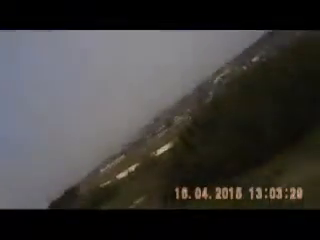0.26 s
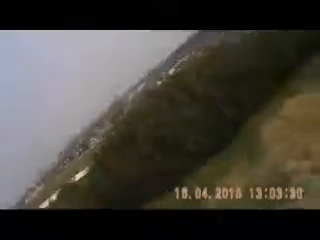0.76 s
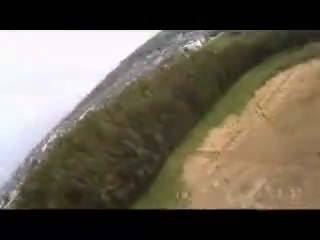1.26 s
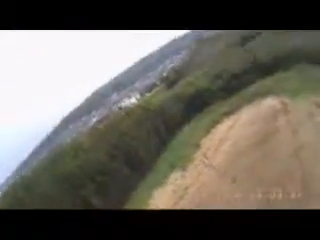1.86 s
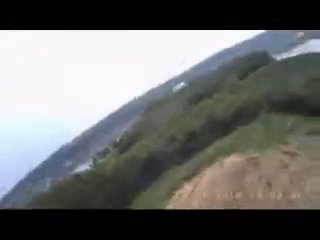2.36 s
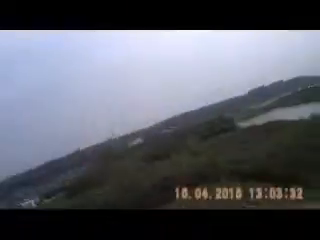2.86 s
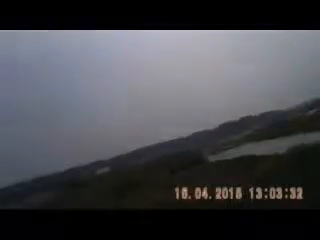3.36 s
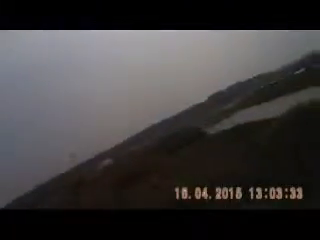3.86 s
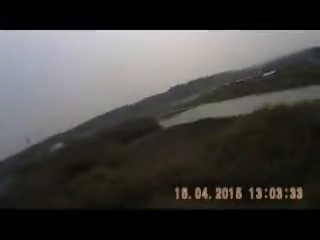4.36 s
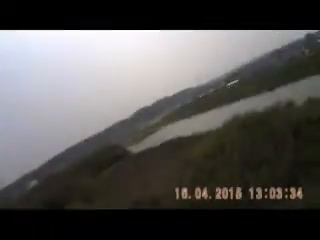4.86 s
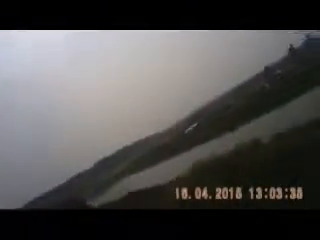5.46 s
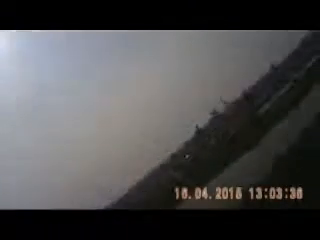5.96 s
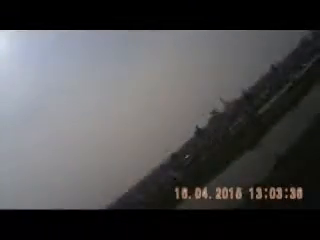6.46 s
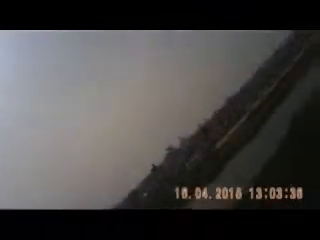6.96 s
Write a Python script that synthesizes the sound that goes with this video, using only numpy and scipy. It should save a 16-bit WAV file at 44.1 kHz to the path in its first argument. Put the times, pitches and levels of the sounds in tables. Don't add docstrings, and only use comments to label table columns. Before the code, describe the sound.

Low wind buffets a small gliding model aircraft with ticking servos, then its electric motor whirs up abruptly into a harsh, rattling buzz.

```python
import sys
import numpy as np
from scipy import signal
from scipy.io import wavfile
from scipy.ndimage import uniform_filter1d, map_coordinates

SR = 44100
rng = np.random.default_rng(int(sys.argv[2]) if len(sys.argv) > 2 else 0)


def magnitude_from_level(level_db):
    exponent = np.asarray(level_db, float) / 20
    return 10 ** exponent


def put_to_file(sound):
    columns = np.atleast_2d(sound).T
    safe = np.clip(columns, -1, 1)
    whole_steps = np.round(safe * 32767)
    wavfile.write(sys.argv[1], SR, whole_steps.astype(np.int16))


N = 318843

# (time [s], speed gained [turns/s], spin-up [turns/s^2], sharpness of the knee [1])
THROTTLE = [
    (4.0157, 87.183, 371.3, 5.85),
    (6.3207, 5.974, 56.56, 2.59),
]
RUN = slice(round(THROTTLE[0][0] * SR), N)
CRUISE_SPEED_HZ = 86


def rms_one(x):
    return x / np.sqrt(np.mean(x ** 2) + 1e-20)


def in_time(rows):
    s, *columns = np.transpose(rows)
    return [np.interp(np.arange(N) / SR, s, c) for c in columns]


def drift(rate):
    r = np.exp(-80 * np.pi * rate / SR)
    slow = signal.lfilter([1], [1, -2 * r, r * r], rng.standard_normal(N // 40 + 2002))[2000:]
    return np.interp(np.arange(N) / 40, np.arange(len(slow)), rms_one(slow))


def band_pass(x, order, band_hz):
    return signal.sosfilt(signal.butter(order, band_hz, "band", fs=SR, output="sos"), x)


def ring(clicks, modes):
    out = 0
    for hz, db, t60 in modes:
        r, w = magnitude_from_level(-60 / (t60 * SR)), 2 * np.pi * hz / SR
        b, a = [0, magnitude_from_level(db) * np.sin(w)], [1, -2 * r * np.cos(w), r * r]
        out = out + signal.lfilter(b, a, clicks + 1e-18)
    return out


def turbulence(spectrum, lumps_db, own_db):
    hz, db = np.transpose(spectrum)
    out, white = 0, rng.standard_normal((2, N))
    edges = hz[0] * 2 ** np.arange(0, np.log2(hz[-1] / hz[0]) + .2, 1 / 3)
    for k, (low, high) in enumerate(zip(edges, edges[1:])):
        band = band_pass(white[k % 2], 2, [low, high])
        level_db = np.interp(np.log(low * high) / 2, np.log(hz), db)
        out = out + band * magnitude_from_level(level_db + own_db * drift(16.3))
    return rms_one(out * magnitude_from_level(lumps_db))


def wind():
    # (frequency [Hz], density [dB per Hz])
    buffet_spectrum = [(18, -39), (30, -10), (75, -6.5), (123, -5.5), (187, -2.5), (293, -2), (444, -7.5),
                       (508, -12.5), (590, -9), (744, -18), (850, -20), (939, -39), (1600, -35),
                       (2080, -47.5), (3520, -120)]
    hiss_spectrum = [(530, 0), (900, 1), (1160, -2.5), (1830, -10.5), (2350, -17.5), (2820, -14.5),
                     (4000, -27.5), (5200, -58), (8800, -120)]
    # (time [s], level [dB])
    airspeed = [(0, -34.5), (.7, -37.5), (1.0, -31.5), (1.55, -33.5), (2.3, -35.5), (2.7, -38.5),
                (3.6, -38.5), (3.95, -43), (4.04, -38)]
    # (time [s], peak level [dB])
    gusts = [(.025, -0.5), (.07, 2.5), (.15, -3), (0.216, -10), (0.287, -22), (0.355, -5.5), (0.671, -20),
             (0.937, -5.5), (1.258, -12), (1.333, -5), (1.56, -11), (1.625, -18), (1.961, -9), (2.012, -10),
             (2.137, -19), (2.477, -4), (2.77, -18), (2.905, -5.5), (3.01, -2.5), (3.084, -7.5),
             (3.135, -4.5), (3.191, -6), (3.363, -5), (3.445, -4), (3.57, -6), (3.707, -9), (3.769, -7)]
    rise_s, fall_s, gust_gain_db = 0.0029, 0.014, -7
    t = np.arange(N) / SR
    hiss_db, = in_time(airspeed)
    power = magnitude_from_level(-21 + 0.16 * (hiss_db + 42)) ** 2
    calm = power.copy()
    for s, db in gusts:
        decay = np.maximum((s - t) / rise_s + 1, (t - s) / fall_s).clip(0)
        power += magnitude_from_level(db + gust_gain_db) ** 2 * np.exp(-2 * decay)
    fade = np.clip((4.13 - t) / .08, 0, 1)
    duck = (calm / power) ** (0.76 / 2)
    eddies = drift(32)
    buffet = np.sqrt(power) * turbulence(buffet_spectrum, 0.5 * eddies, own_db=2.5)
    hiss = magnitude_from_level(hiss_db) * duck * turbulence(hiss_spectrum, 0.27 * eddies, own_db=1.4)
    return fade * (buffet + hiss)


def slipstream(speed, opened, eddies):
    # (frequency [Hz], density [dB per Hz])
    wash_spectrum = [(18, -53), (30, -10), (61, -7.5), (87, -9.5), (108, -3.5), (134, -3), (265, -0.5),
                     (467, -9.5), (924, -9), (1060, -27), (1230, -14), (1290, -27), (1600, -32),
                     (2080, -62), (3520, -120)]
    level_db = -17.5 + opened + 1.85 * drift(4.1) + 0.62 * 20 * np.log10(speed / CRUISE_SPEED_HZ)
    return magnitude_from_level(level_db) * turbulence(wash_spectrum, 0.51 * eddies, own_db=2.0)


def jolts():
    # (time [s], peak level [dB])
    blows = [(0.0553, 2), (0.0702, 0.5)]
    # (frequency [Hz], level [dB], decay t60 [s])
    hull = [(309, 0.5, 0.078), (720, -10.5, 0.036)]
    clicks = np.zeros(N)
    for s, db in blows:
        clicks[round(s * SR)] = -magnitude_from_level(db)
    return ring(uniform_filter1d(clicks, size=24), hull)


def commands():
    # (time [s], peak level [dB], bright whirr [dB], dull click [dB])
    corrections = [(0.0502, -13, -25, -10.5), (0.113, -30.5, -3, -4), (0.1978, -30, -15, -9),
                   (0.2427, -26, -22, -21), (0.2627, -30, -17, 1), (0.2866, -33, -3, -7), (0.374, -29.5, -11, 5),
                   (0.3969, -32, -8, 9), (0.5051, -25.5, -21, -3), (0.573, -31, -17, -12),
                   (0.9047, -32, -15, -2.5), (0.9456, -20.5, -15, -2.5), (0.9895, -24, -15, -2.5),
                   (1.0135, -30.5, -11, 7), (1.0339, -32, -14, 4), (1.1437, -31, -15, -2.5),
                   (1.497, -22.5, -14, -7), (1.7812, -28.5, -14, -2.5), (1.8471, -24, -13, 0.5),
                   (1.8695, -24, -17, -1), (1.9798, -31, -12, -6), (2.0242, -37, -9, -2.5),
                   (2.2003, -33.5, -5, -7), (2.2222, -36, -4.5, -6), (2.5071, -29, -16, -8),
                   (2.9256, -28, -22, -7), (2.969, -32.5, -16, -2.5), (3.652, -31, -18, -6),
                   (3.8989, -36, -19, -1), (4.0416, -34, -9, -4)]
    # (time [s], peak level [dB])
    more_corrections = [(0.156, -34), (0.4368, -33), (0.552, -31), (1.1008, -37), (1.6715, -30.5), (1.8291, -26.5),
                        (2.4422, -34), (2.463, -32), (2.529, -32), (2.6403, -36), (2.8598, -36), (3.3217, -32),
                        (3.3656, -36), (3.499, -35), (3.5213, -38), (3.7183, -35), (3.922, -31)]
    frame_s, first_frame_s = .021985, .0026
    whirr_db, dull_db = -16.5, -6
    frames = np.arange(first_frame_s, THROTTLE[0][0], frame_s)
    size_db = -40 - 0.7 * frames + 2.5 * rng.standard_normal(len(frames)).clip(-3, 1.6)
    taken_s = [row[0] for row in corrections + more_corrections]
    free = np.abs(frames[:, None] - taken_s).min(axis=1) > frame_s / 2
    minor = more_corrections + list(zip(frames[free], size_db[free]))
    return corrections + [(s, db, whirr_db, dull_db) for s, db in minor]


def servos():
    out, t, kicks = np.zeros(N), np.arange(900) / SR, commands()
    grit = rng.standard_normal((len(kicks), 3, len(t)))
    dull = band_pass(grit[:, 0], 2, (1300, 2020))
    middle = band_pass(grit[:, 1], 2, (2500, 3010))
    whirr = band_pass(grit[:, 2], 2, (3600, 4850))
    for k, (s, db, bright_db, dull_db) in enumerate(kicks):
        tick = magnitude_from_level(dull_db) * rms_one(dull[k]) * np.exp(-t / 0.0033)
        tick += magnitude_from_level(-7.0) * rms_one(middle[k]) * np.exp(-t / 0.004)
        tick += magnitude_from_level(bright_db + 12.0) * rms_one(whirr[k]) * t / 0.0034 * np.exp(-t / 0.0031)
        out[round(s * SR):round(s * SR) + len(t)] += magnitude_from_level(db) * tick
    return out


def knocks(turns, share, spread_db):
    at = np.flatnonzero(np.diff(np.floor(turns - share)) > 0)
    chance = np.clip(rng.standard_normal((400, 2))[:len(at)], -2.5, 1.3)
    late = (.00008 * SR * chance[:, 0]).astype(int)
    clicks = np.zeros(N)
    clicks[np.clip(at + late, 0, N - 1)] = magnitude_from_level(spread_db * chance[:, 1])
    return clicks


def loose_mount(turns, speed, opened, eddies):
    # (share of a turn [1], level [dB], spread [dB])
    rebounds = [(0, -2.5, 1.5), (0.291, -6, 3), (.45, -6, 3), (.7, -7, 2.5)]
    # (frequency [Hz], level [dB], decay t60 [s])
    mount = [(1640, -5, 0.034), (2250, 8, 0.0055), (2490, -8, 0.057), (2600, 1, 0.045), (2866, 4.5, 0.015),
             (3260, -7, 0.038)]
    # (frequency [Hz], density [dB per Hz])
    grit_spectrum = [(760, 1), (1300, 2), (1730, -15), (2120, -1), (2400, -2), (2600, 0), (2930, -4.5),
                     (3150, -5), (4000, -21), (5200, -51), (8800, -120)]
    since = np.arange(N) / SR - 4.1
    level_db = -28.5 - 0.5 * opened + 0.96 * since + 250 * np.minimum(since, 0)
    level_db += -4 / (1 + np.exp((speed - 64) / 7.5))
    sharp = uniform_filter1d(knocks(turns, 0, spread_db=1.0), size=8)
    spike = band_pass(sharp, 1, [1100, 2600])
    blows = sum(magnitude_from_level(db) * knocks(turns, share, spread) for share, db, spread in rebounds)
    rebound = ring(blows, mount)
    gate = magnitude_from_level(9.1 * np.cos(2 * np.pi * (turns - .12)))
    grit = gate * turbulence(grit_spectrum, 0.35 * eddies, own_db=1.5)
    on = np.sqrt(np.mean(turns > 0))
    loose = np.clip(turns / 45, .3, 1)
    rattle = magnitude_from_level(-8) * loose * on * rms_one(spike)
    rattle += magnitude_from_level(-4.5 + 1.78 * drift(11.7)) * on * rms_one(rebound) + magnitude_from_level(-6.5) * grit
    return magnitude_from_level(level_db) * rattle


def rotor_search():
    # (time [s], level [dB])
    search_hum = [(3.85, -120), (3.885, -62), (3.9, -35), (3.97, -34), (4.04, -29.5), (4.07, -26.5),
                  (4.15, -27), (4.2, -60), (4.22, -90)]
    # (frequency [Hz], level [dB], decay t60 [s])
    singing_panel = [(2650, -3, 0.0079), (3300, -9, 0.0068), (765, 6, 0.031)]
    hum = rms_one(ring(rng.standard_normal(N), singing_panel))
    return magnitude_from_level(in_time(search_hum)[0] + 2.5 * drift(40)) * hum


def panel_surges():
    # (time [s], peak level [dB], frequency [Hz])
    stray_rings = [(.054, -28, 2600), (.057, -5, 706), (4.1, -23.5, 2600), (4.125, -30, 2600),
                   (4.14, -36, 2880), (4.153, -32, 3300), (4.175, -41, 2280)]
    length_s, rough = .009, .05
    half = round(1.5 * length_s * SR)
    t, out = np.arange(-half, half) / SR, np.zeros(N)
    for s, db, hz in stray_rings:
        i = round(s * SR) - len(t) // 2
        grit = rms_one(uniform_filter1d(rng.standard_normal(4000), size=16))[:len(t)]
        tone = np.sin(2 * np.pi * (hz * t + 1.4 * hz * t ** 2 / 2))
        bell = magnitude_from_level(db) * np.exp(-4 * (t / length_s) ** 2)
        out[i:i + len(t)] += bell * (1 - rough + rough * grit) * tone
    return out


def panels(force):
    # (frequency [Hz], width [Hz], level [dB])
    resonances = [(368, 88, -21), (701, 42, -6.5), (779, 58, 2), (903, 62, -15), (950, 42, -7.5),
                  (1316, 100, -14), (1630, 110, -30), (1940, 270, -15), (2460, 640, -18), (3470, 330, -15),
                  (3770, 470, -6.5)]
    out = 0
    for k, (hz, width_hz, db) in enumerate(resonances):
        r = np.exp(-np.pi * width_hz / SR)
        b = (1 - r * r) / 2 * np.array([1, 0, -1])
        a = [1, -2 * r * np.cos(2 * np.pi * hz / SR), r * r]
        answer = signal.lfilter(b, a, signal.lfilter(b, a, force + 1e-18))
        out = out + (-1) ** k * magnitude_from_level(db) * answer
    return out


def magnet_pull(turns, speed):
    # (shaft order [1], level [dB])
    pulls = [(12, -8), (13, -1), (14, 0.0), (28, -20), (42, -15.5), (84, -23.5)]
    angle, speed = 2 * np.pi * turns[RUN], speed[RUN]
    locked = np.clip((np.arange(N)[RUN] / SR - 4.072) / .012, 0, 1)
    spin_up = np.gradient(speed).clip(0) * SR / THROTTLE[0][2]
    torque = locked * spin_up ** 0.63
    torque *= np.clip((CRUISE_SPEED_HZ - speed) / 3, 0, 1)
    out = np.zeros(N)
    out[RUN] = panels(torque * sum(magnitude_from_level(db) * np.cos(round(order) * angle) for order, db in pulls))
    return out


def shaft():
    cruise_hz, climb_hz = 88.4, 90.7
    t, speed = np.arange(N) / SR, 0
    creep = 2.94 * np.exp(-np.maximum(t - THROTTLE[0][0], 0) / 1.022)
    for k, (s, gain, rate, knee) in enumerate(THROTTLE):
        ramp = rate * np.maximum(t - s, 1e-6)
        plateau = gain - creep * (k == 0)
        speed = speed + (ramp ** -knee + plateau ** -knee) ** (-1 / knee)
    return speed, np.clip((speed - cruise_hz) / (climb_hz - cruise_hz), 0, 1)


def shaft_turns(speed):
    turns = np.zeros(N)
    turns[RUN] = np.cumsum((speed * (1 + .0002 * drift(6)))[RUN]) / SR
    return turns


def motor(turns, speed, opened):
    # (shaft order [1], level [dB])
    cruise_orders = [(1, 0), (2, -8), (3, -6), (4, -12), (5, -20.5), (6, -19.5), (7, -16), (8, -14.5),
                     (9, -14), (10, -16.5), (11, -10), (12, -15), (13, -17.5)]
    climb_orders = [(1, 0.5), (2, -11.5), (3, -7.5), (4, -2.5), (5, -42), (6, -39), (7, -14), (8, -13),
                    (9, -23), (10, -12.5), (11, -9.5), (12, -15), (13, -12.5)]
    angle, speed, opened = 2 * np.pi * turns[RUN], speed[RUN], opened[RUN]
    speed_db = 20 * np.log10(speed / CRUISE_SPEED_HZ)
    unbalance_db = -18 + 2.14 * speed_db - 10 / (1 + np.exp((speed - 71) / 4.3))
    pole_db = -30 + 2.8 * speed_db - 9 * opened
    switch_db = -40.5 + speed_db - 5 * opened + drift(23)[RUN]
    shake = 0
    for (order, low_db), (_, high_db) in zip(cruise_orders, climb_orders):
        waver_db = min(1.2 + .2 * order, 3) * drift(8)[RUN]
        level_db = low_db + opened * (high_db - low_db) + waver_db
        lag = .7 * np.pi * max(order - 11, 0) + (order in (4, 5, 6))
        flutter = .28 * drift(12)[RUN]
        shake = shake + magnitude_from_level(level_db) * np.cos(order * angle - lag + flutter)
    whine = magnitude_from_level(pole_db) * np.cos(14 * angle - .8) + magnitude_from_level(switch_db) * np.sin(42 * angle)
    carrier = 2 * np.pi * 7597 * np.arange(len(angle)) / SR
    whine += magnitude_from_level(-49.5 + unbalance_db + 18 + 7 * opened) * np.sin(carrier - 42 * angle)
    out = np.zeros(N)
    out[RUN] = np.sqrt(2) * (magnitude_from_level(unbalance_db) * shake + whine)
    return out


def scene():
    speed, opened = shaft()
    turns = shaft_turns(speed)
    eddies = drift(35)
    air = wind() + slipstream(speed, opened, eddies)
    airframe = jolts() + servos() + loose_mount(turns, speed, opened, eddies)
    drive = rotor_search() + panel_surges() + magnet_pull(turns, speed) + motor(turns, speed, opened)
    return (air + airframe + drive)[None]


def top_cut(x):
    return signal.sosfilt(signal.butter(12, 15360, fs=SR, output="sos"), x)


def record(dry):
    # (time [s], jump [full scale])
    seams = [(1.1272, .06), (2.1272, .025), (3.1272, -.055), (4.1272, .04), (5.1272, .03)]
    low = signal.sosfilt(signal.butter(2, 550, fs=SR, output="sos"), dry[0])
    x = dry[0] + .18 * low ** 2
    x = signal.sosfilt(signal.butter(6, 4100, fs=SR, output="sos"), x)
    x = signal.sosfilt(signal.butter(1, 25, "high", fs=SR, output="sos"), x)
    step = SR / 8000
    at = np.arange(seams[0][0] * SR % step - step, N + step, step)
    taken = map_coordinates(x, [at], order=1, mode="nearest")
    lift = 0.28
    taken = np.clip(np.convolve(taken, [-lift, 1 + 2 * lift, -lift], "same"), -.98, .98)
    played = np.interp(np.arange(N), at, taken)
    played += .45 * signal.sosfilt(signal.butter(2, 11500, "high", fs=SR, output="sos"), played)
    for s, jump in seams:
        played[round(s * SR) - 5:round(s * SR) + 1] -= jump * np.arange(1, 7) / 6
    return top_cut(played[None])


dry = scene()
out = record(dry)
put_to_file(out)
```